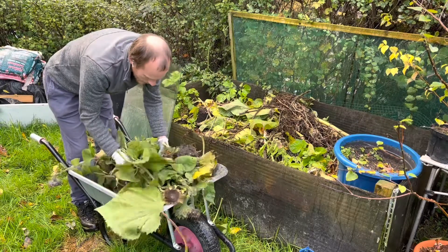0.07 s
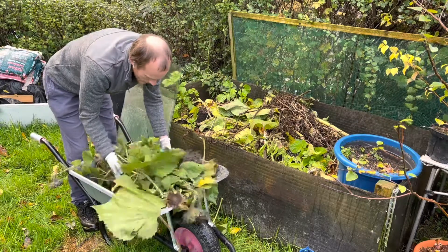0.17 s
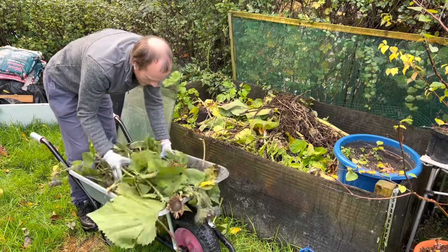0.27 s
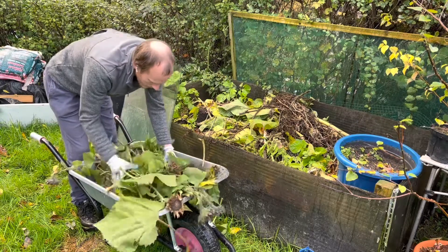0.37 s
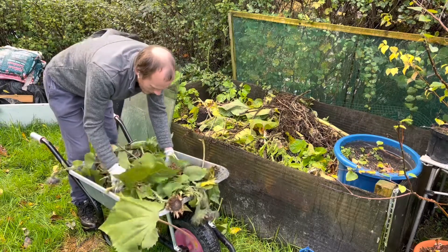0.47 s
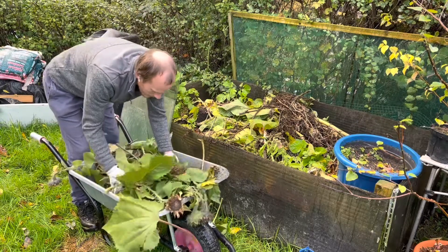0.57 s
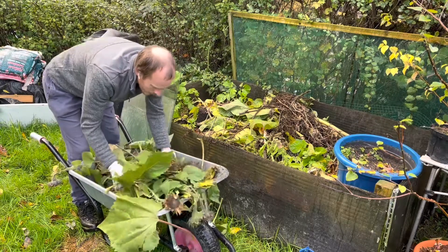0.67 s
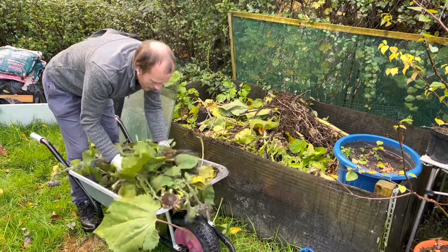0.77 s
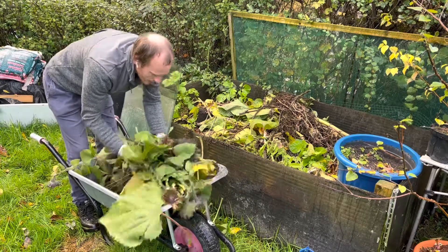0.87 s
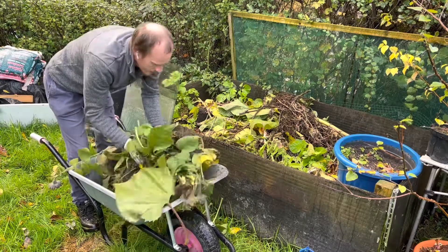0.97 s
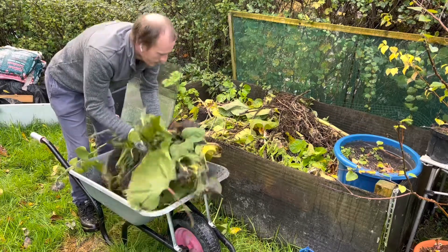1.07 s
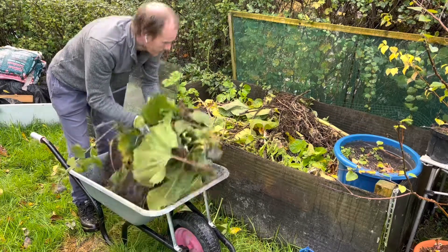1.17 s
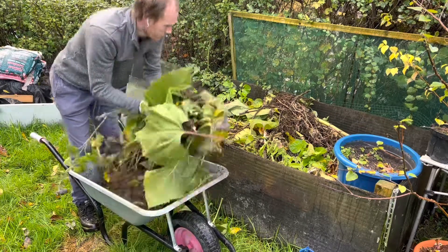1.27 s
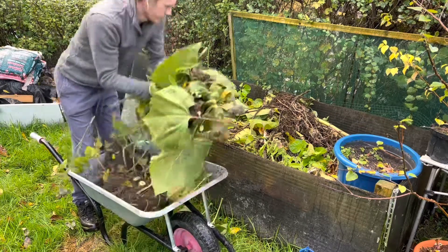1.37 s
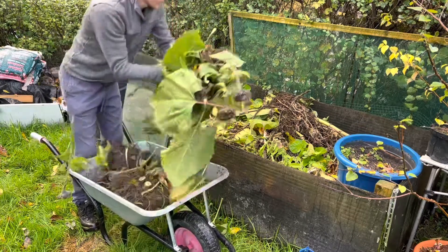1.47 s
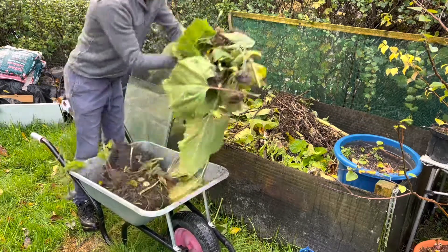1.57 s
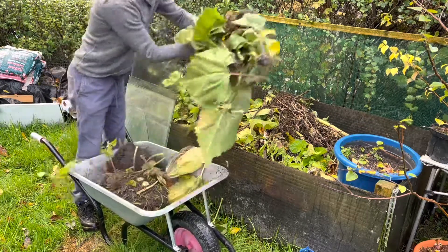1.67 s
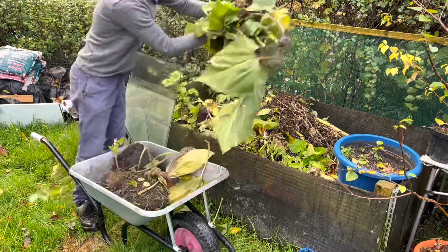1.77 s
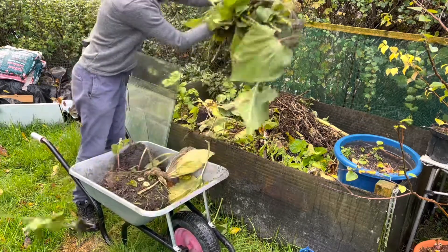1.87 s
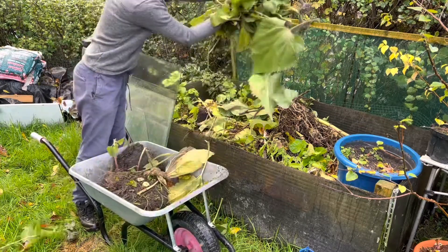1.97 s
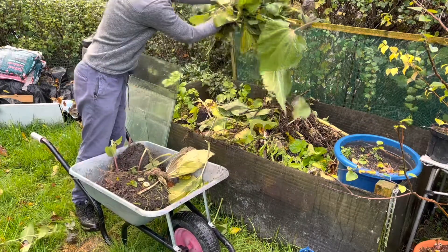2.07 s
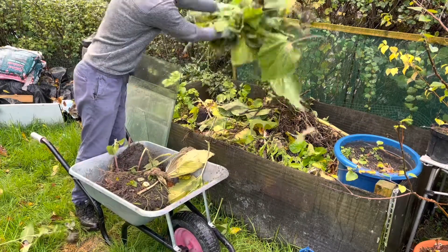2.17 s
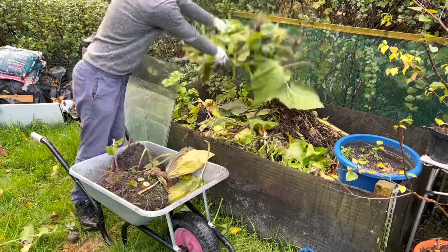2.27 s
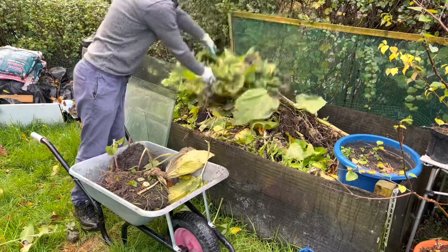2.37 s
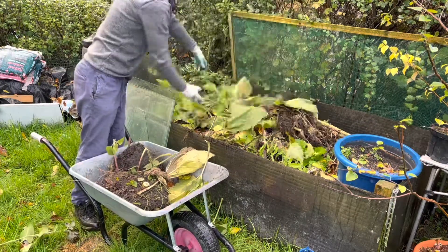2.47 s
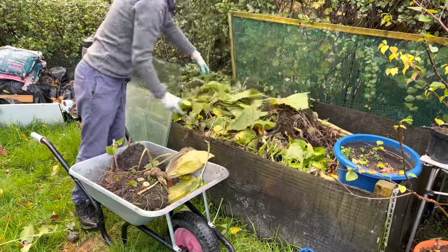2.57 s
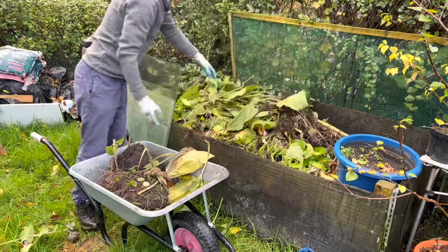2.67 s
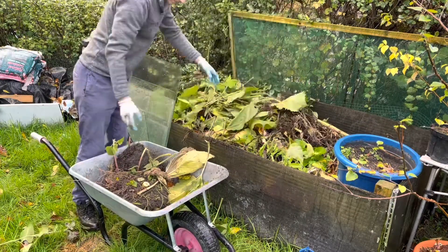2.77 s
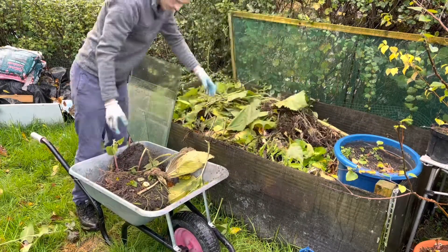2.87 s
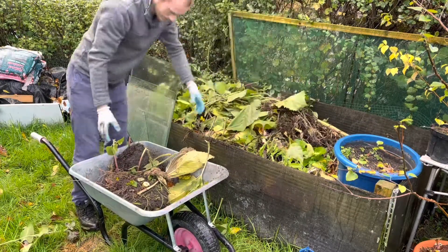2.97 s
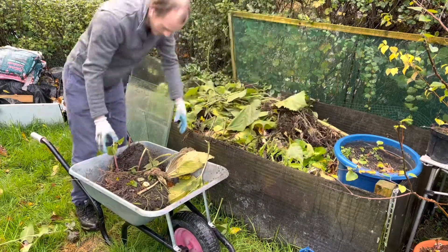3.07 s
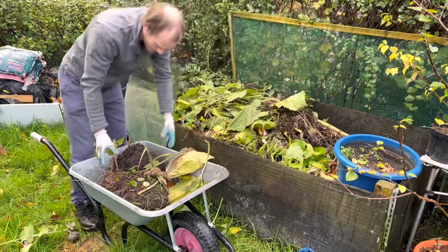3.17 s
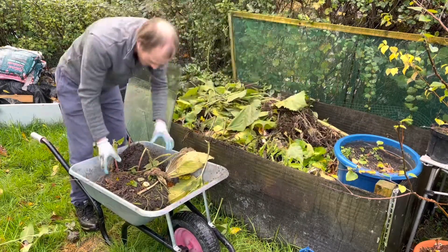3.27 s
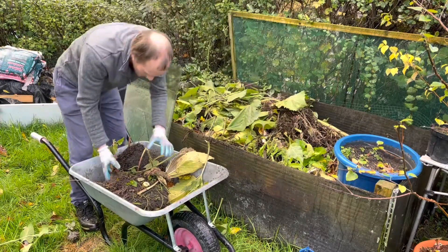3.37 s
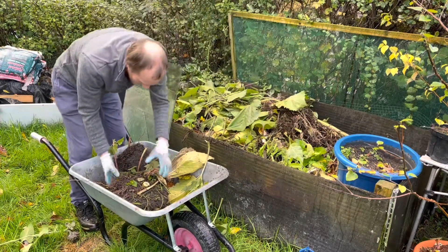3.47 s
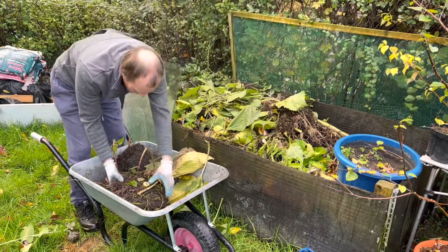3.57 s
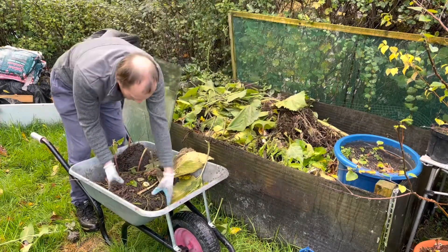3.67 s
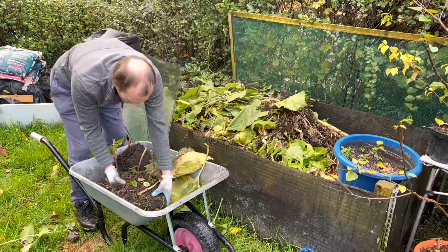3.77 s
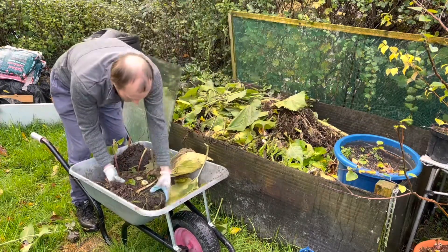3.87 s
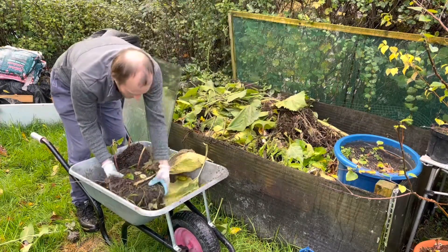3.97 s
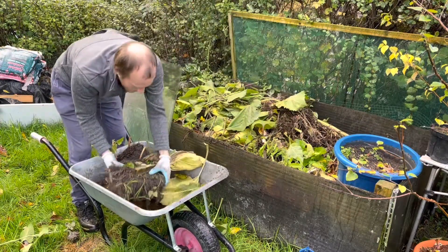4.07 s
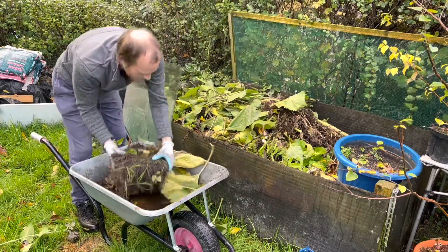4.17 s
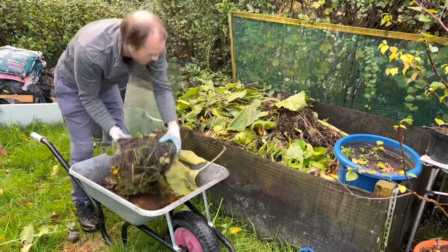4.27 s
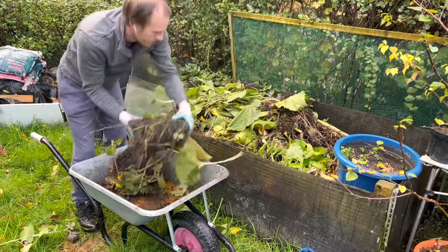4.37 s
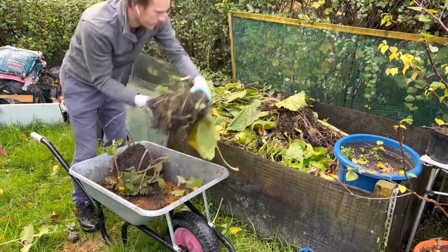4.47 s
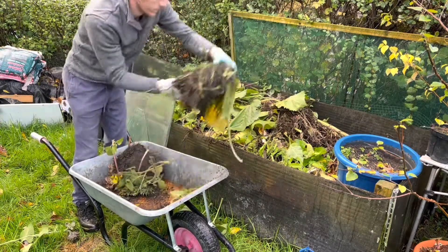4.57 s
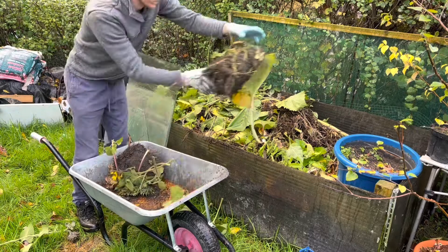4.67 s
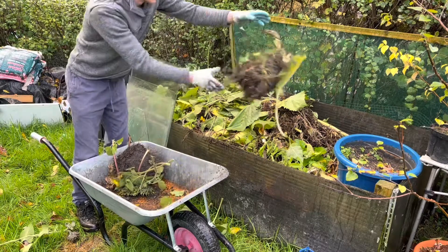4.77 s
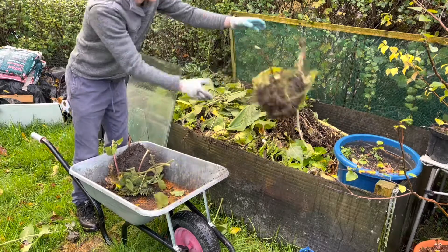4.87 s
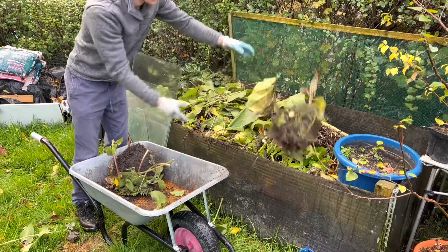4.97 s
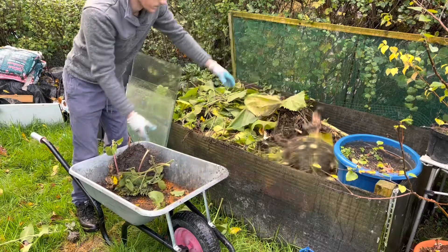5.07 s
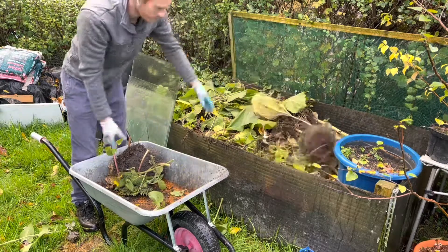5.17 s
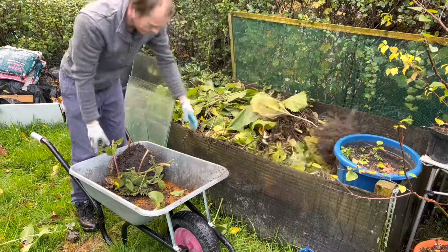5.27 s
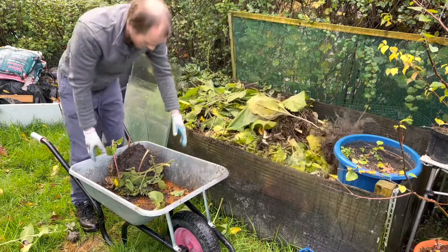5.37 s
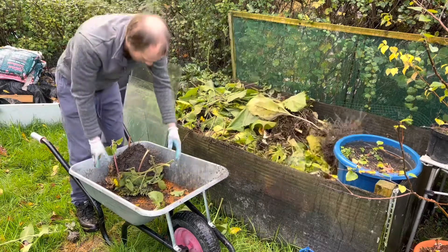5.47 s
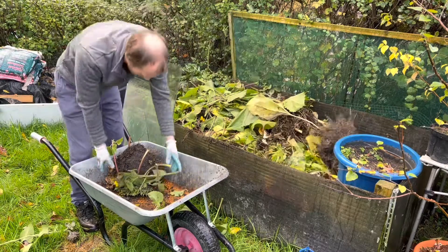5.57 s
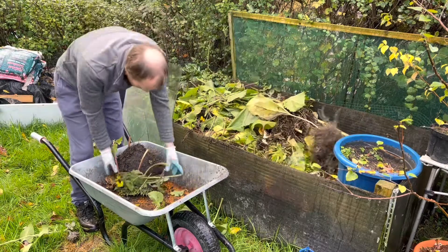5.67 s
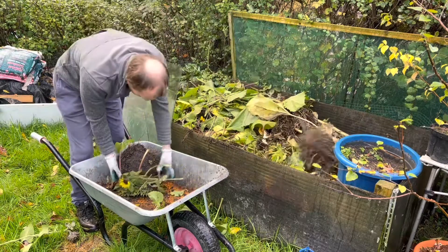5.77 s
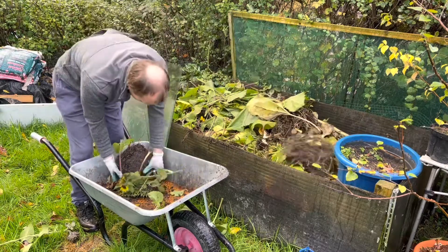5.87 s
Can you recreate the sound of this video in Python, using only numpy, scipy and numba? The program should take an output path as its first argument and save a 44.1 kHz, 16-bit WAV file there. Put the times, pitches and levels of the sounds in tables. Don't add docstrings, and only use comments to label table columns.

```python
import sys
import numpy as np
from scipy import signal
from scipy.fft import rfft, irfft
from scipy.io import wavfile
from scipy.ndimage import uniform_filter1d
from numba import njit

SR = 44100
rng = np.random.default_rng(int(sys.argv[2]) if len(sys.argv) > 2 else 0)


def invert_db(x):
    u = np.asarray(x, float) / 20
    return 10 ** u


def store_wav(level_fs):
    pcm = np.round(np.clip(np.atleast_2d(level_fs), -1, 1) * 32767)
    wavfile.write(sys.argv[1], SR, pcm.T.astype(np.int16))


N = 261513


def unit(x):
    return x / np.sqrt(np.mean(x ** 2))


def noise(n=N):
    return rng.standard_normal(n)


def band(x, lo_hz, hi_hz, order=2):
    sos = signal.butter(order, [lo_hz, min(hi_hz, .45 * SR)], "band", fs=SR, output="sos")
    return signal.sosfilt(sos, x)


def tinted(x, spectrum, from_hz):
    hz, db = np.transpose(spectrum)
    bin_hz = np.maximum(np.arange(N // 2 + 1) * SR / N, from_hz)
    return irfft(rfft(x) * invert_db(np.interp(np.log(bin_hz), np.log(hz), db)), N)


def walk(rate):
    hold = int(SR / rate)
    return 0.97 * uniform_filter1d(np.repeat(noise(N // 256 + 1), hold)[:N], hold)


@njit
def rings(start, hz, t60, size, n, sr):
    y = np.zeros(n)
    for k in range(len(start)):
        turn = np.exp(2j * np.pi * hz[k] / sr - np.log(1000) / (t60[k] * sr))
        z = size[k] + 0j
        for i in range(int(start[k] * sr), min(n, int((start[k] + t60[k]) * sr))):
            y[i] += z.imag
            z *= turn
    return y


def knocks(table, cluster, spread, wide, trim_db):
    out, length = np.zeros(N), 4096
    t = np.arange(length) / SR
    for s, db, hz, t60, crack_db in table:
        t60 = np.clip(t60, .004, .4)
        fan = np.linspace(-1, 1, cluster) + 0.13 * noise(cluster)
        size = invert_db(0.23 * noise(cluster) - 11.0 * fan ** 2)
        ring = rings(np.zeros(cluster), hz * np.exp(spread * fan), np.full(cluster, t60), size, length, 1. * SR)
        crack = unit(band(noise(length), hz / wide, hz * wide)) * invert_db(crack_db - 60 * t / t60)
        hit = band(ring + crack, hz / wide, hz * wide) * invert_db(db + trim_db)
        start = int(s * SR)
        out[start:start + length] += hit[:N - start]
    return out


def ringing(table, t60):
    return [(s, db, hz, t60, crack_db) for s, db, hz, crack_db in table]


def garden():
    # (pitch [Hz], level [dB])
    garden_colour = [(100, -24), (180, -5.5), (370, -5), (900, -8), (4000, -10.5), (11000, -22.5)]
    return unit(tinted(noise(), garden_colour, 60)) * invert_db(-80.5 + 1.2 * walk(6))


def moves(table):
    s, swell_s, fade_s, db, other_db = np.transpose(table)[:, :, None]
    late = np.arange(0, N + 64, 64) / SR - s
    away = np.where(late < 0, -late / swell_s.clip(.004), late / fade_s.clip(.01)).clip(max=3)
    power = invert_db(2 * (db - 12 * (away + away ** 4)))
    return power.sum(0), (power * invert_db(2 * other_db)).sum(0)


def handling():
    # (loudest time [s], swell [s], fade [s], leaves [dB], crackle against them [dB])
    lift = [(.036, 0.26, 0.38, -35, -1.5), (.286, 0.37, 0.48, -35.5, -0.4), (.459, 0.1, 0.44, -33, 1.5),
            (.791, 0.22, 0.094, -28.5, 1.2), (.902, 0.16, 0.2, -27.5, -.6), (1.047, 0.017, 0.14, -31, -2.5),
            (1.126, 0.14, 0.3, -26.5, 0.7), (1.385, 0.03, 0.066, -40, -0.5),
            (1.455, 0.037, 0.34, -48, -2.5), (1.485, .012, 0.027, -51.5, 7.5),
            (1.565, 0.027, .035, -56.5, 9.5), (1.622, .008, .02, -60, 9), (1.658, .008, 0.023, -60.5, 9.5),
            (1.815, .136, 0.65, -64, -1.5), (2.159, 0.051, 0.27, -65.5, 0.5)]
    landing = [
        (2.24, 0.032, .07, -43.5, -5),
        (2.333, 0.1, 0.085, -33.5, 0),
        (2.484, 0.087, 0.16, -24, 0),
        (2.523, .031, 0.44, -63, 0),
        (2.668, 0.036, 0.047, -43, 0),
    ]
    dig = [
        (3.493, 0.055, 0.16, -74, -6.5),
        (3.556, 0.016, 0.17, -52.5, 0),
        (3.698, .015, .06, -44, -1.5),
        (3.75, 0.041, 0.066, -40, 1.3),
        (3.863, 0.092, 0.043, -44, -0.1),
        (4.221, 0.0316, 0.0262, -35.5, 0),
        (4.249, .422, 0.069, -44, 0.5),
        (4.329, 0.16, 0.14, -39, -2),
        (4.512, .07, 0.11, -47.5, -6),
    ]
    throw = [(4.573, .015, 0.063, -42.5, -0.4), (4.68, .12, 0.074, -40, -5),
             (4.879, 0.0084, 0.045, -37.5, 3), (4.86, .3, 0.2, -43.5, -7.5),
             (4.977, 0.025, 0.041, -42.5, 0), (5.025, .015, 0.054, -38.5, -0.26),
             (5.094, .085, 0.14, -37.5, 3), (5.272, 0.38, .045, -52, -2.5), (5.4, .405, 0.07, -60.5, -8),
             (5.48, 0.054, 0.05, -73.5, -1.5), (5.58, 0.12, .1, -65.5, -4.5),
             (5.66, 0.099, 0.089, -45, 0.5), (5.79, .1, 0.14, -36, 0.7), (5.88, .06, 0.064, -39, 2)]
    # (loudest time [s], swell [s], fade [s], soil rumble [dB], stalks against the soil [dB])
    armful = [(.1, 0.5, 0.7, -42.5, 2.5), (.25, .06, 0.24, -37.5, -18), (.478, 0.034, 0.063, -42.5, -11),
              (.6, 0.05, 0.059, -43, 1.5), (.787, 0.73, 1, -38.5, 3), (1.121, 0.063, 0.063, -38.5, 5),
              (1.24, 0.046, 0.21, -29.5, -4), (1.38, 0.047, 0.024, -39, -1), (1.45, 0.017, 0.068, -48.5, 1),
              (1.514, 0.051, 0.65, -62.5, -2.3), (2.315, 0.27, 0.08, -67, 4.5),
              (2.444, 0.022, 0.11, -34.5, -2), (2.54, 0.13, 0.07, -37, 4), (2.65, 0.028, 0.051, -53, 9),
              (2.888, 0.68, 0.11, -76.5, 1)]
    root_ball = [(3.488, 0.024, .634, -64.5, -10), (3.695, 0.014, 0.12, -58.5, 10.5),
                 (3.803, .155, 0.18, -51, -0.5), (4.225, 0.32, 0.22, -48.5, 4.5),
                 (4.41, 0.036, 0.046, -47, -2), (4.528, .04, 0.046, -50.5, -5.5),
                 (4.652, 0.24, 0.42, -54.5, 7), (4.839, 0.022, 0.22, -49, 10),
                 (5.111, .306, 0.12, -46.5, 2.5), (5.289, .211, .056, -65, 3),
                 (5.407, .162, 0.054, -71.5, 4.5), (5.715, 0.36, 0.63, -72, -2.5),
                 (5.772, 0.068, 0.16, -45.5, -4), (5.887, 0.069, .08, -48, 3.5)]
    family_db = [0.2, -0.15, -0.33, .3]
    leaves, crackle = moves(lift + landing + dig + throw)
    soil, stalks = moves(armful + root_ball)
    stalks = stalks + leaves * invert_db(2 * -12.5)
    levels = []
    for power, trim_db in zip((soil, stalks, leaves, crackle), family_db):
        db = 10 * np.log10(power + 1e-10)
        levels.append(np.interp(np.arange(N) / 64, np.arange(len(db)), db) + trim_db)
    return levels


def slips(rate, fade_s, spread_db):
    kicks = (rng.random(N) < rate / SR) * invert_db(spread_db * noise().clip(-2, 2))
    return 1 + 0.35 * signal.lfilter([1], [1, -np.exp(-1 / (fade_s * SR))], kicks)


def rustle():
    # (lowest [Hz], highest [Hz], grains [1/s], cycles a grain [count], size spread [dB], hiss [dB])
    families = [
        (165.8, 480, 400, 4.6, 1, 10.5),
        (446, 1310, 770, 4.6, -0.5, 8),
        (1238, 3327, 1500, 5, 2.5, 9),
        (3280, 13000, 2700, 7.3, 3.5, 9.5),
    ]
    # (pitch [Hz], level [dB])
    plant_colour = [(180, -31), (300, -7), (412, -4.5), (459, -12.5), (701, -9.5), (1330, -6.5), (2090, -3),
                    (3710, 1), (4590, -2.5), (5940, 1), (6610, -2), (9800, -10.5), (11200, -25),
                    (14600, -62), (22000, -120)]
    shared, out = slips(22, 0.0053, 1.0), 0
    for (lo, hi, rate, cycles, spread_db, hiss_db), level_db in zip(families, handling()):
        when, pitch, luck, sign = rng.random((min(15000, int(rate * N / SR)), 4)).T
        hz = lo * (hi / lo) ** pitch
        size = invert_db(-spread_db * np.log(luck + .003)) * np.sign(sign - .5)
        grains = unit(rings(when * N / SR, hz, 3 * cycles / hz, size, N, 1. * SR))
        mix = tinted(grains + invert_db(hiss_db) * noise(), plant_colour, 300)
        edges = np.geomspace(lo, hi, 4)
        sparse = np.interp(level_db, [-64, -55, -43.5], [.5, 1.9, 1])
        thirds = 0
        for k in range(3):
            swell = invert_db(sparse * (1.3 * walk(9) + 0.9 * walk(35)))
            thirds = thirds + (-1) ** k * band(mix, edges[k], edges[k + 1], order=3) * swell
        out = out + unit(thirds * shared) * invert_db(level_db)
    return out


def stem_ticks():
    # (time [s], peak [dB], pitch [Hz], crack against the ring [dB])
    tick_rows = [(0.155, -18, 2230, -1), (0.254, -29, 2720, -9), (0.352, -23, 2396, 1),
                 (0.403, -18, 2640, -3), (0.776, -15, 2227, 1.5), (0.875, -16, 2000, 1),
                 (1.041, -17.5, 1460, 0.5), (1.123, -14, 3240, -3.5), (1.294, -16.5, 1950, 0.5),
                 (2.135, -54, 970, -3), (2.405, -20.5, 1600, -1), (2.446, -19, 2000, -16),
                 (2.484, -16, 3766, -1), (2.505, -12, 2974, -2.5), (2.527, -10, 2740, 5.5),
                 (3.38, -44.5, 5440, -4), (3.543, -50, 1780, 3), (4.185, -30, 2140, 0),
                 (4.211, -20.5, 2000, -2), (4.569, -33, 2240, 0), (4.633, -38, 886, -4),
                 (4.83, -31, 910, -7), (4.874, -25, 5880, -4.5), (5.019, -28, 3050, 0.5)]
    return knocks(ringing(tick_rows, .008), cluster=3, spread=.3, wide=2.0, trim_db=-6.0)


def soil_thuds():
    # (time [s], peak [dB], pitch [Hz], ring t60 [s], crack against the ring [dB])
    thud_rows = [(0.245, -20.5, 325, 0.2, -13), (1.209, -22.5, 353, 0.28, -7), (2.637, -25, 633, 0.05, -3),
                 (2.975, -39, 304, 0.049, 0), (3.472, -39.5, 426, 0.086, -9.5),
                 (3.695, -26, 780, 0.062, -18), (3.808, -34, 234, 0.24, -21), (3.908, -30, 178, 0.31, -7),
                 (3.962, -35, 224, 0.083, -19), (4.211, -20.5, 269, 0.16, -19),
                 (4.524, -31, 239, 0.098, -8), (4.59, -31.5, 266, 0.1, -6), (4.831, -26.5, 223, 0.46, -21),
                 (5.278, -36, 223, 0.066, -7), (5.405, -48.5, 347, 0.071, -1),
                 (5.624, -38, 700, 0.25, -9.5), (5.729, -20.5, 204, 0.2, -12), (5.87, -24, 210, 0.34, -21)]
    return knocks(thud_rows, cluster=2, spread=0.03, wide=1.8, trim_db=-4.0)


def crumbs():
    # (time [s], peak [dB], pitch [Hz], crack against the ring [dB])
    crumb_rows = [
        (0.7754, -18, 7000, -6),
        (1.3857, -28, 5530, 3),
        (1.4521, -35, 4570, -2),
        (1.481, -33, 4990, -3),
        (1.54, -45, 7500, 11),
        (1.5684, -29.5, 7360, 4.5),
        (1.617, -44, 5800, 13),
        (1.651, -52, 6100, 9),
        (1.7333, -56, 6490, 10.5),
        (4.8773, -27.5, 5870, 6.5),
    ]
    return knocks(ringing(crumb_rows, 0.027), cluster=5, spread=0.23, wide=1.5, trim_db=-7.5)


def stem_snaps():
    # (time [s], peak [dB], pitch [Hz], crack against the ring [dB])
    snap_rows = [(0.7761, -24, 2270, -7), (0.8749, -22, 2070, -1), (1.0415, -20, 1400, -2),
                 (1.1294, -17, 3670, -7), (1.2044, -22.5, 2010, 10), (1.3843, -28, 2990, 10.5),
                 (1.6506, -14.5, 1685, -11), (2.135, -50, 990, 3.5), (2.2278, -31, 2185, -20.5),
                 (2.6409, -17.5, 2910, -9), (2.6628, -17, 3487, -5.5), (2.9754, -61, 1011, -2.5),
                 (3.5448, -55, 1780, -6), (3.695, -37, 1710, -6.5), (4.1849, -31, 2170, -2),
                 (4.2108, -22, 1865, 3.5), (4.569, -46, 2410, -6), (4.6334, -32, 870, 2),
                 (4.7895, -33, 1680, -11), (4.8308, -34, 930, 8), (4.8748, -21, 5950, -22),
                 (5.0195, -17.5, 3150, -6.5), (5.0883, -23, 3090, -2), (5.2872, -43.5, 1830, 8.5),
                 (5.3712, -63, 2860, -2.5), (5.4364, -49, 1890, -8), (5.572, -46, 2190, -4.5),
                 (5.66, -30.5, 2240, -13), (5.7823, -39, 3150, 13)]
    return knocks(ringing(snap_rows, 0.04), cluster=5, spread=.2, wide=3.1, trim_db=-8.5)


def steel_bang():
    # (time [s], blow [dB], contact [ms])
    blow_rows = [
        (1.4445, -18.5, .5),
        (1.4493, -1, 0.083),
        (1.457, -10, 0.36),
        (1.4685, -6.5, .1),
        (1.482, -32, .4),
        (1.525, -11, .3),
    ]
    tray_hz = [350, 433, 497, 530, 580, 633, 732, 767, 835, 897, 1056, 1207, 1465, 1605, 1793, 2035, 2229,
               2480, 2666, 3031, 3435, 3844]
    tray_db = [0, -9.5, -12.5, -9, 1, -7.5, -17, -7, 0.5, -3.5, -4.5, -10.5, -6, -10, -6, -8.5, -14, -13.5,
               -7, -20, -17, -15.5]
    tray_t60 = [0.21, 0.23, .5, .35, 0.36, 0.25, 0.39, 0.45, 0.28, .3, 0.31, .3, 0.23, 0.28, 0.34, 0.22,
                0.19, 0.2, 0.24, .2, .17, .15]
    hz, t60 = np.array(tray_hz, float), np.array(tray_t60)
    out, length = np.zeros(N), 16384
    t = np.arange(length) / SR
    for s, blow_db, ms in blow_rows:
        share = invert_db(1.5 * noise(len(hz))) * (-1.) ** np.arange(len(hz))
        soft = 1 / (1 + (hz * ms / 1000) ** 2)
        size = invert_db(np.array(tray_db) + blow_db - 19.5) * share * soft
        out += rings(np.full(len(hz), s), hz, t60, size, N, 1. * SR)
        tail = invert_db(-15.0 - 60 * t / 0.29) * unit(band(noise(length), 320, 1000))
        tail += invert_db(-20.5 - 60 * t / 0.17) * unit(band(noise(length), 900, 3100))
        tail += invert_db(-25 - 60 * t / 0.13) * unit(band(noise(length), 3100, 6400))
        start = int(s * SR)
        out[start:start + length] += invert_db(blow_db) * tail
    return out * invert_db(np.interp(np.arange(N) / SR, [1.665, 1.69], [0, -14]))


def twigs():
    # (time [s], peak [dB], pitch [Hz], crack against the ring [dB])
    twig_rows = [
        (1.4503, 0.5, 1030, -1),
        (1.4624, -8, 1443, -2),
        (4.2108, -16, 2010, -8),
        (4.6334, -32, 1290, 7),
        (4.6756, -27, 2760, 9),
        (5.5196, -57, 3330, -7),
        (5.5418, -53.5, 1310, -1),
        (5.561, -46.5, 2140, -0.5),
        (5.6234, -38, 1990, 5.5),
    ]
    return knocks(ringing(twig_rows, 0.017), cluster=4, spread=0.16, wide=2.2, trim_db=-11.0)


def pebbles():
    # (time [s], peak [dB], pitch [Hz], ring t60 [s], crack against the ring [dB])
    pebble_rows = [
        (1.4513, -11, 2703, 0.074, 5.5),
        (1.4656, -15.5, 2410, 0.12, 12.5),
        (1.5244, -15, 2250, 0.044, -16),
        (1.5678, -23.5, 2850, 0.093, -11),
        (1.6168, -19, 2630, 0.041, -24),
        (1.657, -31, 2880, 0.047, -6),
        (1.672, -31, 1350, 0.13, 1),
    ]
    return knocks(pebble_rows, cluster=5, spread=0.16, wide=1.4, trim_db=-13.0)


def grit_taps():
    # (time [s], peak [dB], pitch [Hz], crack against the ring [dB])
    tap_rows = [(1.452, -22, 4100, 2), (1.4655, -18, 3898, 2.5), (1.469, -13, 1500, 3),
                (1.478, -22, 3700, 4), (2.976, -48, 710, -1), (3.444, -49, 9800, -0.5),
                (3.473, -47, 428, -3.5), (3.468, -59.5, 2300, 3), (3.49, -63, 2900, -1),
                (5.29, -44, 2006, -5), (5.318, -47, 1070, -8), (5.336, -49, 2000, 1),
                (5.355, -48, 1910, -6), (5.37, -48, 2980, -4), (5.376, -43, 1250, -1),
                (5.39, -43, 1900, -4), (5.412, -55, 2060, -10), (5.436, -51, 2000, -3),
                (5.458, -59, 2093, -3), (5.543, -56.5, 1150, -1), (5.563, -55, 2300, -2),
                (5.58, -52, 2700, 0.5), (5.6, -49, 2100, 0), (5.618, -48, 760, -2)]
    return knocks(ringing(tap_rows, .035), cluster=2, spread=0.031, wide=1.3, trim_db=-3.0)


def sliding_hiss(row, tail_s):
    t0, t1, hz, width, db = row
    times = [t0 - .004, t0, t1, t1 + 0.025, t1 + tail_s]
    shape = np.interp(np.arange(N) / SR, times, [-34.0, 0.5, -3.5, -14.0, -25.0], left=-90, right=-90)
    hiss = unit(band(noise(), hz - width / 2, hz + width / 2, order=3))
    return hiss * invert_db(db + shape + 1.6 * walk(84))


def glove_squeak():
    # (start [s], end [s], pitch [Hz], width [Hz], level [dB])
    squeak_row = (3.408, 3.455, 7500, 900, -55)
    return sliding_hiss(squeak_row, .085)


def leaf_whisper():
    # (start [s], end [s], pitch [Hz], width [Hz], level [dB])
    whisper_row = (5.345, 5.425, 7800, 2000, -64)
    return sliding_hiss(whisper_row, 0.046)


def scene():
    mono = garden() + rustle() + stem_ticks() + soil_thuds() + crumbs() + stem_snaps()
    mono += steel_bang() + twigs() + pebbles() + grit_taps() + glove_squeak() + leaf_whisper()
    return np.array([mono, mono])


def muted(hz, t):
    # (start [s], end [s], centre [Hz], width [Hz], depth [dB])
    muted_rows = [(1.047, 1.059, 9000, 4500, -23), (1.425, 1.438, 6460, 8000, -8),
                  (1.523, 1.542, 7400, 7000, -15), (1.595, 1.601, 5500, 4500, -15),
                  (1.7, 1.9, 850, 600, -6.5), (2.575, 2.64, 4500, 600, -18),
                  (3.547, 3.62, 4390, 806, -18.5), (3.62, 3.69, 3650, 900, -20),
                  (3.673, 3.69, 1700, 900, -3), (3.66, 3.688, 9500, 3040, -10.5),
                  (3.9, 3.96, 1400, 1200, -3), (4.162, 4.177, 4940, 4000, -8),
                  (4.463, 4.506, 5500, 5000, -14), (4.506, 4.56, 3960, 1800, -8),
                  (4.802, 4.83, 4130, 1600, -17), (5.256, 5.31, 5000, 1000, -21),
                  (5.316, 5.46, 900, 300, -13.5), (5.35, 5.385, 2500, 400, -14),
                  (5.42, 5.541, 2710, 500, -5), (5.46, 5.54, 850, 499, -6), (5.555, 5.625, 4000, 1410, -18),
                  (5.562, 5.613, 6500, 4000, -3)]
    gain_db = 0
    for t0, t1, mid, width, db in muted_rows:
        in_band = np.exp(-(2 * (hz - mid) / width) ** 4)
        in_time = np.exp(-((2 * t - t0 - t1) / (t1 - t0)) ** 4)
        gain_db = gain_db + db * in_band * in_time
    return gain_db


def thin_out(x, thin, patch_db, hole_share, depth_db):
    size, hop = 768, 384
    z = signal.stft(x, window="cosine", nperseg=size, noverlap=hop)[2]
    hz = np.arange(385)[:, None] * SR / size
    t = np.arange(z.shape[1]) * hop / SR
    power = np.abs(z) ** 2 + 1e-20
    narrow, wide = (np.abs(uniform_filter1d(power, size=n, axis=0)) for n in (11, 91))
    treble = np.clip((hz - 1500) / 4000, 0, 1)
    luck = np.repeat(rng.standard_normal((77, z.shape[1])), 5, axis=0)
    luck = (luck + np.roll(luck, 1, axis=1) + np.roll(luck, 2, axis=1)) / np.sqrt(3)
    starved = 2.3 * (rng.random(z.shape[1]) < .12)
    standing = luck + (10 * np.log10(narrow / wide)).clip(min=-5.5) / 4.5 - starved
    steps_db = treble * (patch_db * luck + depth_db * (standing < -hole_share))
    kept = power / (power + thin * (0.45 + treble) * narrow)
    z = z * invert_db(steps_db + muted(hz, t)) * kept
    return signal.istft(z, window="cosine", nperseg=size, noverlap=hop)[1][:N]


def split(mono):
    # (time [s], lowest [Hz], highest [Hz])
    split_rows = [
        (.392, 6250, 8350),
        (.857, 4650, 6350),
        (.857, 9650, 11100),
        (1.251, 6900, 8350),
        (1.251, 8950, 11100),
        (3.597, 6900, 8350),
    ]
    side, t = 0, np.arange(N) / SR
    for s, lo, hi in split_rows:
        patch = np.cos(np.pi / 2 * ((t - s) * SR / 1024).clip(-1, 1))
        loud = np.sqrt(np.sum((patch * band(mono, lo, hi, order=4)) ** 2) / np.sum(patch ** 2))
        side = side + patch * loud * invert_db(-2) * unit(band(noise(), lo, hi, order=6))
    return side


def low_pass(x):
    return signal.sosfilt(signal.butter(12, 11380, fs=SR, output="sos"), x)


def record(dry):
    # (time [s], edge before [Hz], edge after [Hz])
    low_cut = (1.99, 287.6, 219)
    s, before_hz, after_hz = low_cut
    mono = thin_out(dry[0], thin=.25, patch_db=1.6, hole_share=2.0, depth_db=-16)
    tight = signal.sosfilt(signal.cheby2(6, 28, before_hz * 0.87, "high", fs=SR, output="sos"), mono)
    loose = signal.sosfilt(signal.butter(3, after_hz, "high", fs=SR, output="sos"), mono)
    opened = np.clip((np.arange(N) / SR - s) / 0.35, 0, 1)
    loudness = np.sqrt(uniform_filter1d(band(mono, 200, 500) ** 2, size=900).clip(0))
    wobble = loudness * unit(band(noise(), 83, 240, order=1)) * invert_db(-38.0 + 17.0 * opened)
    wobble += invert_db(-97.5) * unit(band(noise(), 110, 260))
    top = signal.ellip(10, .3, 90, 11150, fs=SR, output="sos")
    mono = signal.sosfilt(top, (1 - opened) * tight + opened * loose + wobble)
    side = split(mono)
    return low_pass(np.array([mono + side, mono - side]))


dry = scene()
out = record(dry)
store_wav(out)
```